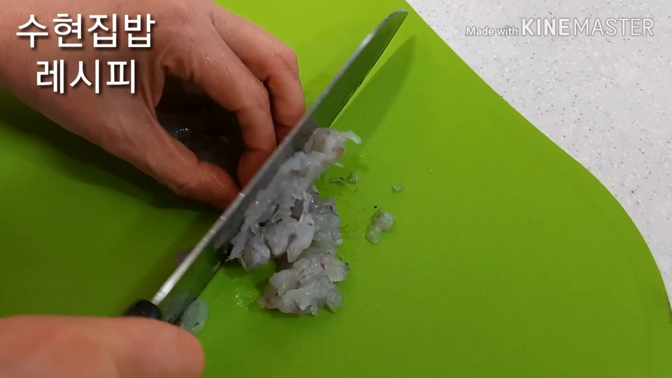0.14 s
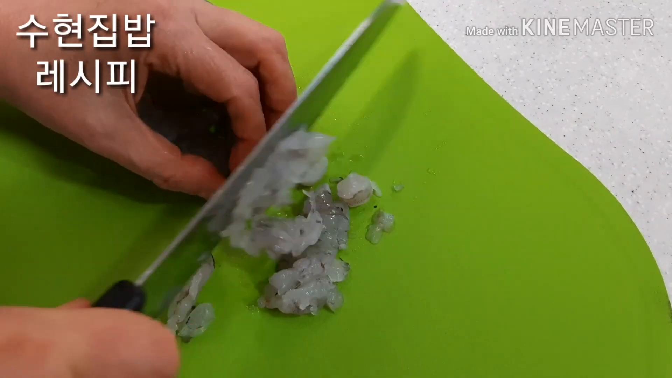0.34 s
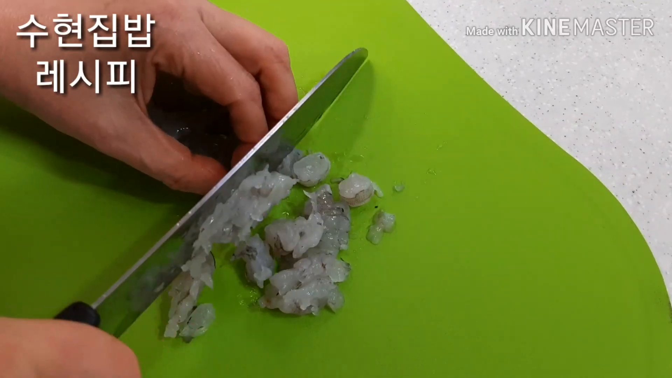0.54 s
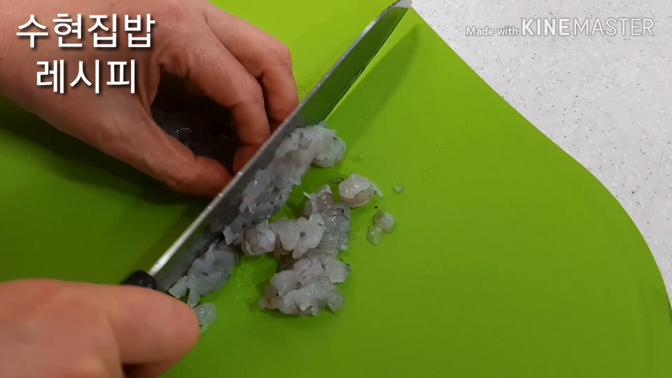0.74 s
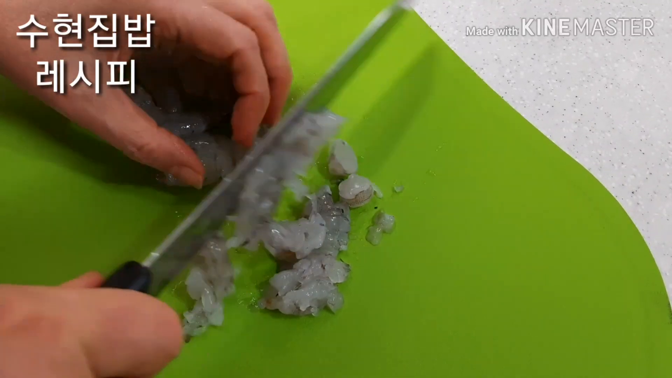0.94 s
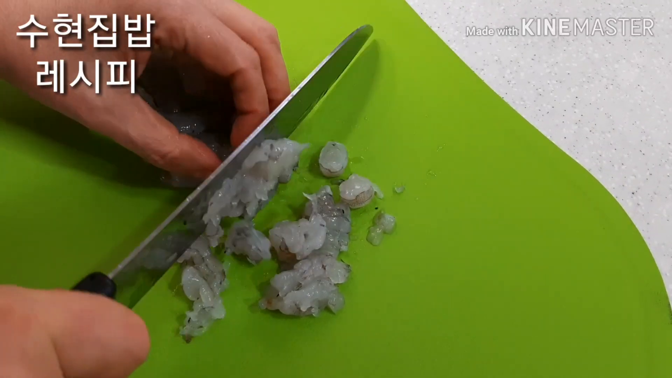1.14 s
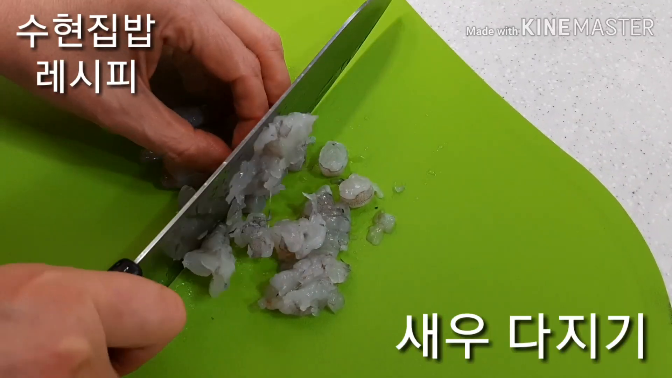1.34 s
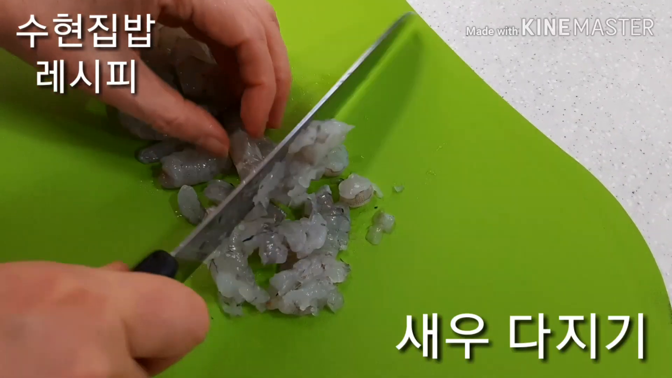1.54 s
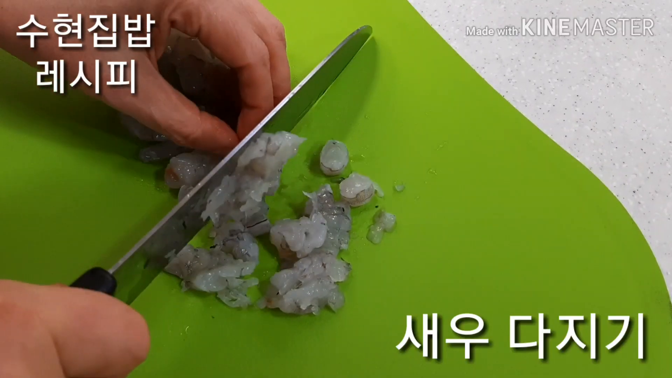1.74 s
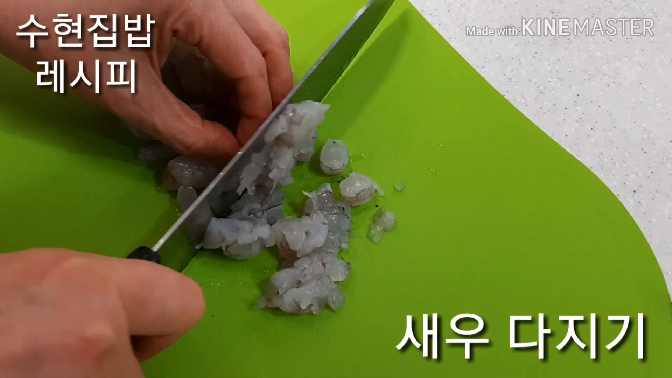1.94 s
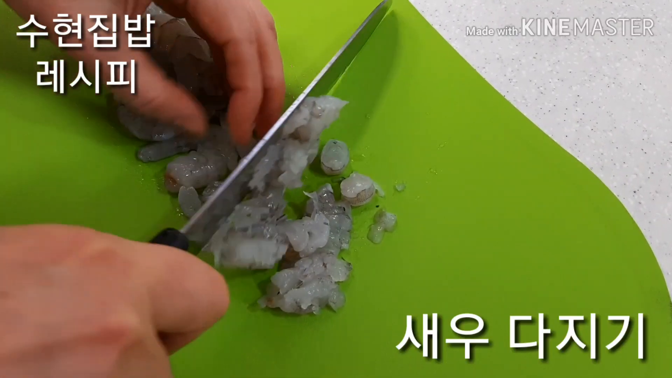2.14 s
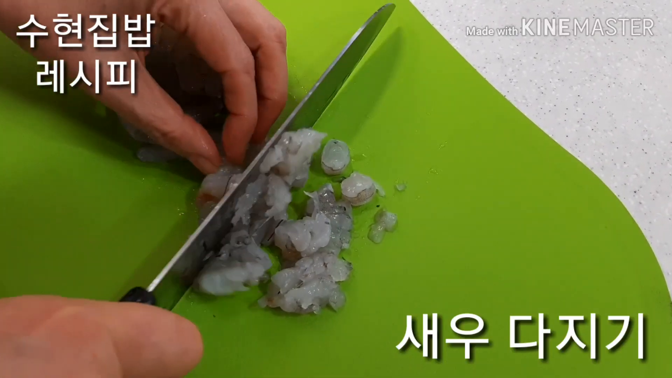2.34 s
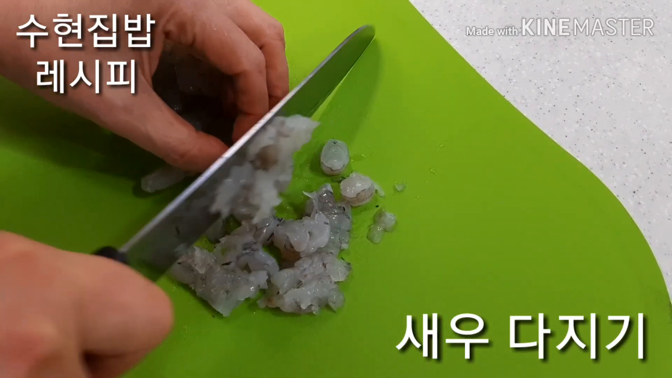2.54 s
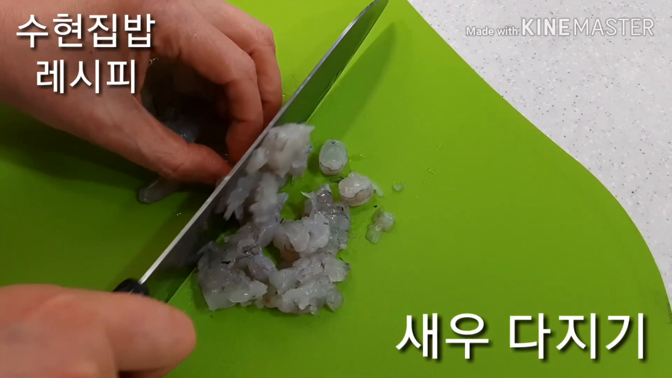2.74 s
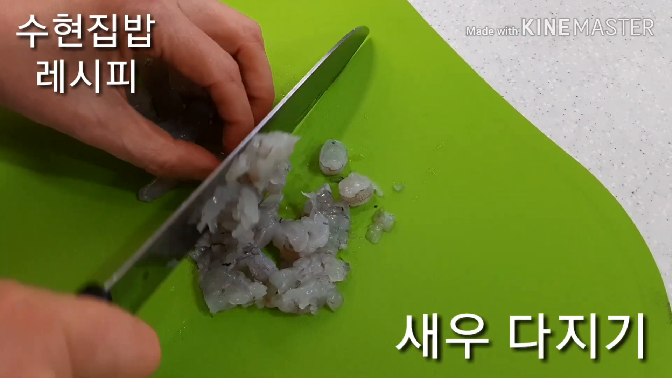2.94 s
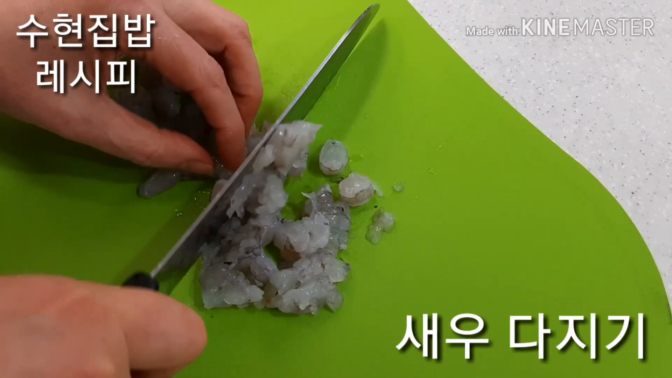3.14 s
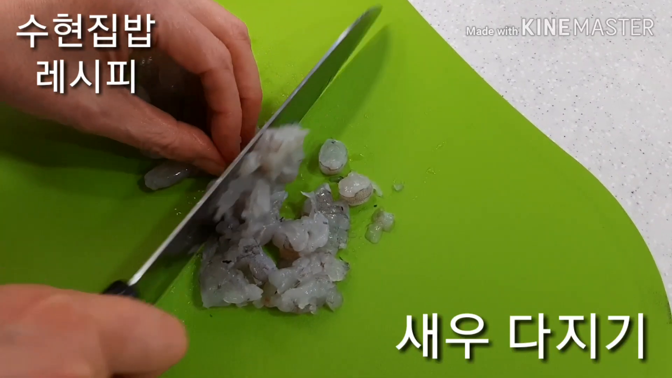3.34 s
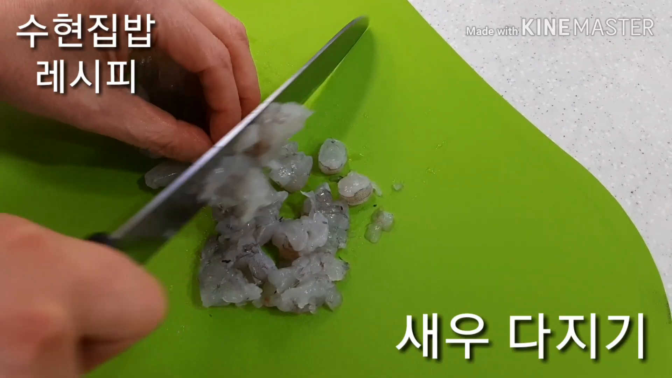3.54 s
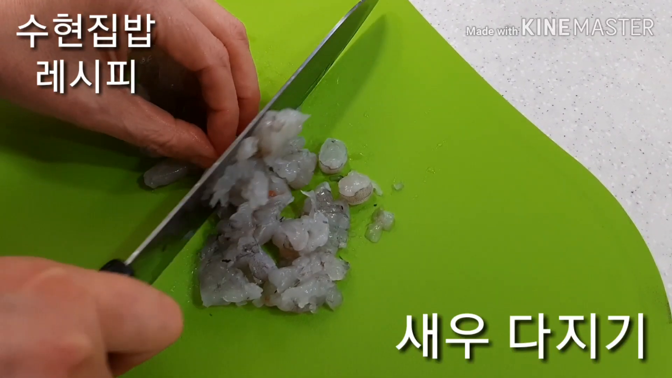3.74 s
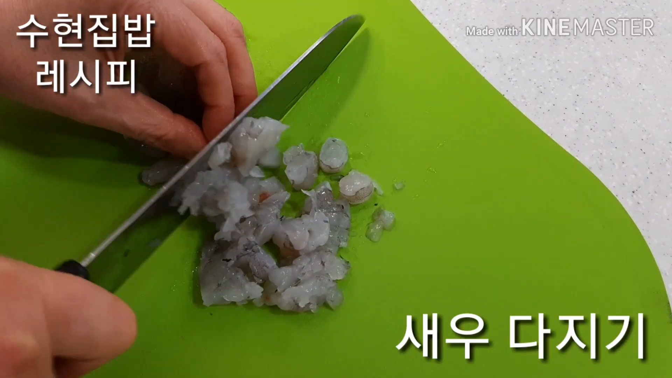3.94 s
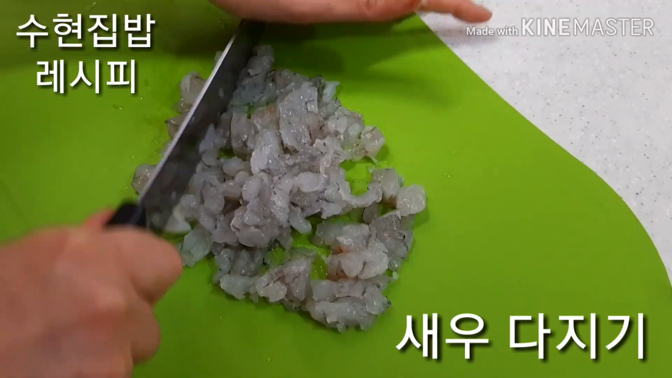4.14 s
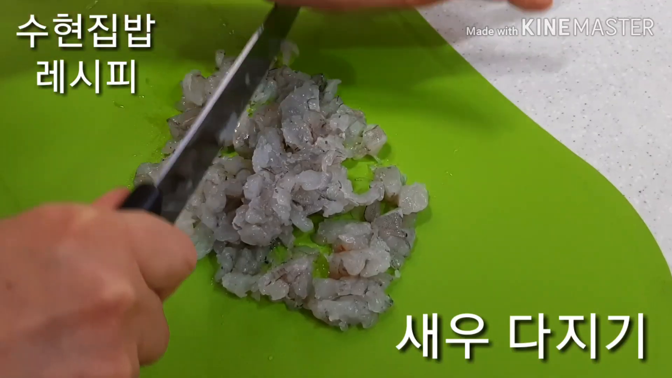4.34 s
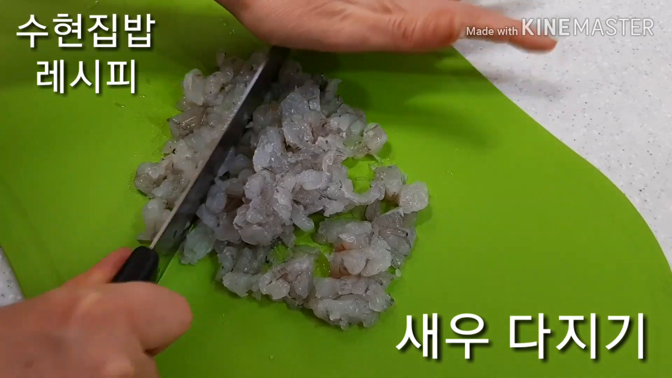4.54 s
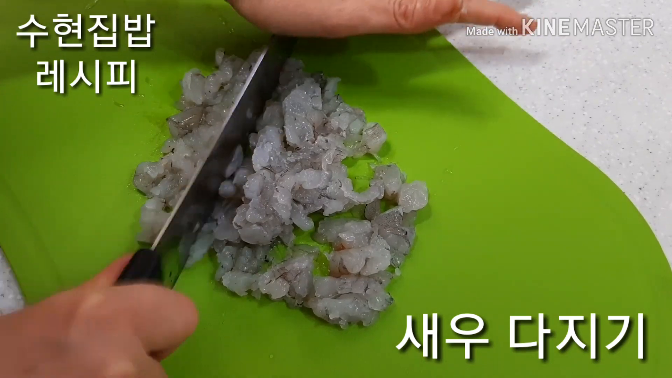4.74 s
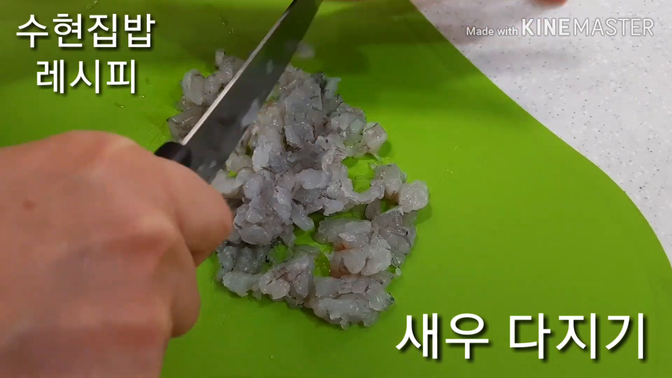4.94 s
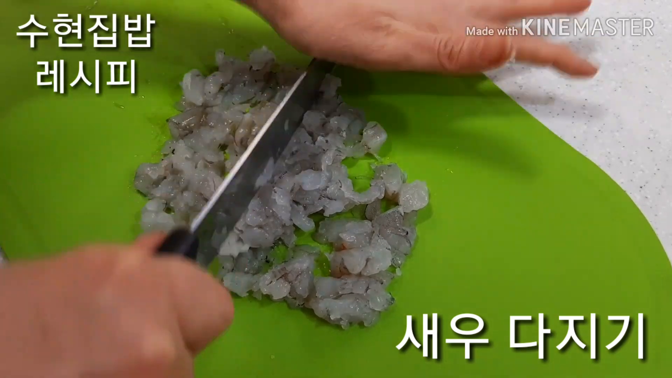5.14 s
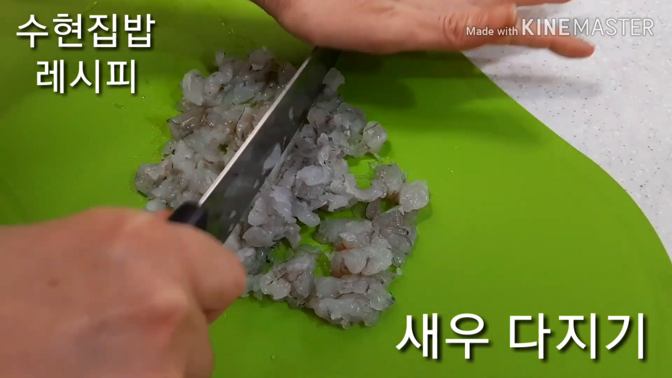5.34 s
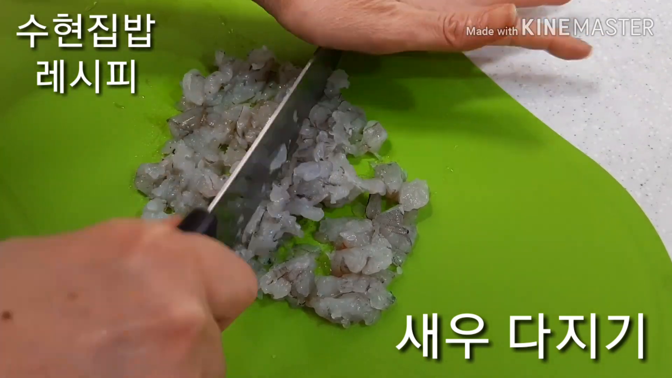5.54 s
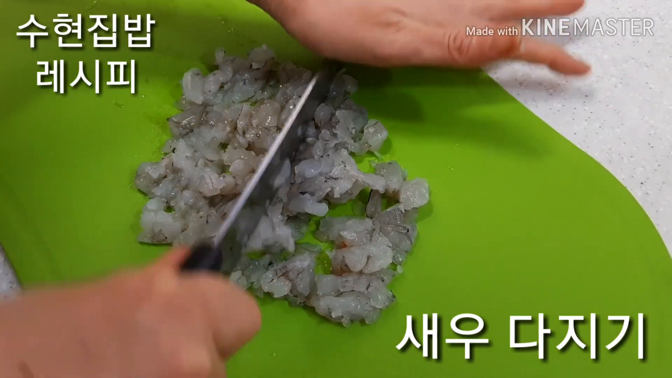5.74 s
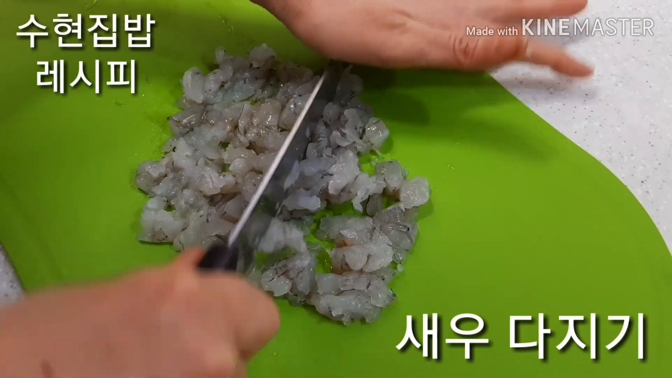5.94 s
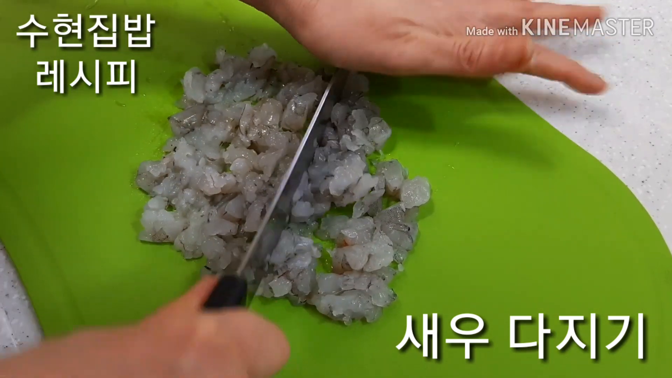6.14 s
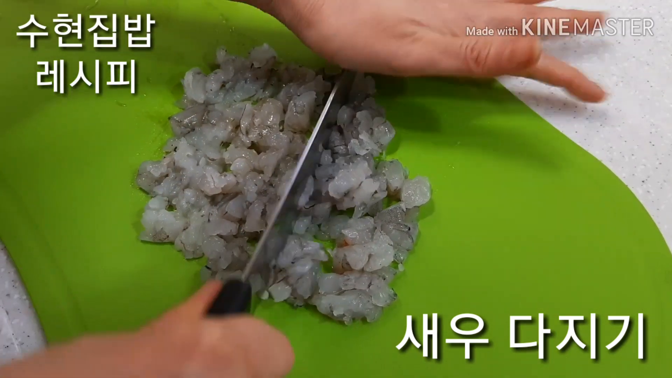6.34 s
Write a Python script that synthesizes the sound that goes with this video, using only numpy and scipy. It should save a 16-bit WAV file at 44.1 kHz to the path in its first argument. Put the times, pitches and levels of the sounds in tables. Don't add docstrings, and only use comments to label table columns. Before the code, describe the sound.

A kitchen knife slices wet shrimp on a thin plastic mat, slow soft crunches and knocks, then quicker, louder mincing chops with counter thuds.

```python
import sys
import numpy as np
from scipy import signal
from scipy.fft import rfft, irfft
from scipy.io import wavfile
from scipy.ndimage import uniform_filter1d

SR = 44100
rng = np.random.default_rng(int(sys.argv[2]) if len(sys.argv) > 2 else 0)


def pcm_store(signal):
    levels = np.round(np.clip(np.atleast_2d(signal), -1, 1) * 32767)
    wavfile.write(sys.argv[1], SR, levels.astype(np.int16).T)


def to_linear_factor(level_db):
    exponent = np.asarray(level_db, float) / 20
    return 10 ** exponent


N = 281358
PORT_LAG = 14


def unit(x):
    return x / np.sqrt(np.mean(x ** 2))


def on_log(hz, table):
    f, v = np.transpose(table)
    return np.interp(np.log(np.maximum(hz, 1)), np.log(f), v)


def colour(x, table):
    hz = np.fft.rfftfreq(x.shape[-1], 1 / SR)
    return unit(irfft(rfft(x) * to_linear_factor(on_log(hz, table)), x.shape[-1]))


def drift(shape, samples):
    return unit(uniform_filter1d(rng.standard_normal(shape), size=samples))


def decay(t_s, t60_s):
    return np.exp(-np.log(1000) * t_s / t60_s)


def high_pass(x, hz):
    return signal.sosfilt(signal.butter(2, hz, "high", fs=SR, output="sos"), x)


def add(track, sound, s):
    i = min(int(s * SR), N)
    track[..., i:i + sound.shape[-1]] += sound[..., :N - i]


def ports(x, lag, pan_db=0):
    left = np.pad(x, (max(lag, 0), 0))[:len(x)]
    right = np.pad(x, (max(-lag, 0), 0))[:len(x)]
    return np.array([left * to_linear_factor(pan_db / 2), right * to_linear_factor(-pan_db / 2)])


def alike(mid, side, hz, corner_hz):
    share = np.clip(hz / corner_hz, 0, 1)
    return np.array([mid + share * side, mid - share * side]) / np.sqrt(1 + share ** 2)


def ring(modes, gain_db, detune=np.ones(1), stretch=1):
    hz, db, t60 = np.transpose(modes)[:, :, None]
    t = np.arange(int(SR * min(t60.max() * stretch, 1 / 3))) / SR
    tones = np.sin(2 * np.pi * hz * detune[:, None] * t)
    h = (to_linear_factor(db + gain_db[:, None]) * decay(t, t60 * stretch) * tones).sum(0)
    return h / np.abs(h).max()


# frequency in Hz, density in dB per Hz.
HUM_SPECTRUM = [(15, -56), (25, -1), (190, -2), (320, -4.5), (581, -21), (980, -20), (1900, -29.5),
                (15500, -34)]


def kitchen():
    mid, side = (rfft(colour(rng.standard_normal(N), HUM_SPECTRUM)) for _ in range(2))
    hum = irfft(alike(mid, side, np.fft.rfftfreq(N, 1 / SR), 920), N)
    level_db, swell_db = -66.5, 1.07
    return to_linear_factor(level_db) * hum * to_linear_factor([[0], [0.5]]) * to_linear_factor(swell_db * drift(N, 5000))


def slips(per_s, spread_db, smooth):
    size = to_linear_factor(spread_db * np.minimum(rng.exponential(size=N), 4))
    clicks = (rng.random(N) < per_s / SR) * size * rng.standard_normal(N)
    return unit(unit(clicks) + smooth * rng.standard_normal(N))


def patchy(x, db, cells_hz, cells_ms):
    f, t, z = signal.stft(x, SR, nperseg=256)
    field = rng.standard_normal(z.shape)
    field = uniform_filter1d(field, size=max(int(cells_hz / f[1]), 1), axis=-2)
    field = unit(uniform_filter1d(field, size=max(int(cells_ms / 1000 / t[1]), 1), axis=-1))
    return unit(signal.istft(z * to_linear_factor(db * field), SR, nperseg=256)[1][..., :N])


def pressure(rows, shape, attack_s):
    rise_db, let_go_s, tail_s = 25, 0.018, 0.26
    gain = np.zeros((3, N))
    for s, length_s, first_db, last_db, *rumble_db in rows:
        times = np.cumsum([s - attack_s, attack_s, max(length_s, 0.001), let_go_s, tail_s])
        i = np.arange(max(int(times[0] * SR), 0), min(int(times[-1] * SR), N))
        for k, (early_db, late_db, drop_db, fall_db_s) in enumerate(shape):
            start, end = first_db + early_db, last_db + late_db
            released = end - drop_db
            db = np.array([start - rise_db, start, end, released, released - fall_db_s * tail_s])
            if k == 1:
                db = db + sum(rumble_db)
            gain[k, i] = np.maximum(gain[k, i], to_linear_factor(np.interp(i / SR, times, db)))
    return gain


# frequency in Hz, level in dB, t60 in seconds.
SLAB_MODES = [(52.4, -4, 0.081), (80.5, -30, 0.031), (118, -9.5, 0.028), (134, 6, 0.085), (148.7, -6, 0.45),
              (198.3, 3, 0.19), (211.8, 0, 0.25), (224.5, -1, 0.13)]
# frequency in Hz, level in dB, t60 in seconds.
COUNTER_MODES = [(240, -29, 0.15), (290, -24, 0.2), (342, -5, 0.31), (369.3, 7.5, 0.18), (389, -4, 0.13),
                 (435, 7.5, 0.096), (507.6, -2.5, 0.17), (560.5, 5.5, 0.1), (644, 6.5, 0.07),
                 (693.3, 0, 0.082), (748.7, -4.5, 0.17), (796, -17.5, 0.19), (873, -8, 0.084),
                 (969, -13.5, 0.11)]


def rumble(gain):
    out, modes = 0, SLAB_MODES[-4:] + COUNTER_MODES
    tilt_db = np.linspace(-2.5, 3, len(modes))
    for lag in (-4, 4, PORT_LAG):
        spot, *port = rng.standard_normal((3, len(modes)))
        shake = np.array([ring(modes, tilt_db + 5.3 * p, 1 + 0.017 * spot, stretch=0.61) for p in port])
        judder = slips(400, 1.2, 0.2)
        scale = np.std(signal.fftconvolve(judder, shake[0]))
        out = out + signal.fftconvolve(ports(judder * gain, lag), shake, axes=1)[:, :N] / scale
    return high_pass(out, 120) * to_linear_factor(-11)


# start in seconds, length in seconds, hiss in dB at the bite,
# hiss in dB at the end, rumble re hiss in dB.
SLICES = [(0.042, 0.025, -55.5, -56, 8.5), (0.07, 0.024, -52.5, -48.5, 11), (0.105, 0.035, -50, -50, 11.5),
          (0.658, 0.097, -65, -45.5, 9.5), (1.316, 0.081, -55, -52.5, 10), (1.915, 0.072, -56, -52, 11),
          (2.36, 0.028, -63.5, -63, 14), (2.7, 0.089, -55, -53.5, 9.5), (3.036, 0.07, -68, -61, 12.5),
          (3.374, 0.045, -52, -46.5, 9.5), (3.69, 0.078, -51.5, -56.5, 10.5), (4.036, 0.068, -53, -56, 10)]
# start in seconds, length in seconds, hiss in dB at first,
# hiss in dB at last, rumble re hiss in dB.
TIP_PLANTS = [
    (1.777, 0.031, -68.5, -71, 29),
    (4.46, 0.058, -61, -69, 36),
    (5.192, 0.016, -57, -66, 36),
]
# start in seconds, length in seconds, hiss in dB at first,
# hiss in dB at last, rumble re hiss in dB.
MINCE_CHOPS = [
    (4.549, 0.019, -56.5, -41.5, 9),
    (4.798, 0.017, -63, -37, 1.5),
    (5.24, 0.039, -46.5, -43, 8.5),
    (5.471, 0.023, -59, -41, 9.5),
    (5.69, 0.022, -53, -38, 2.5),
    (5.88, 0.045, -73.5, -38.5, 11.5),
    (6.118, 0.016, -43.5, -38, 7.5),
    (6.322, 0.022, -52.5, -45, 13),
    (6.364, 0.0052, -41, -43, -6),
]
# start in seconds, length in seconds, hiss in dB at first,
# hiss in dB at last.
PEELS = [(0.232, 0.015, -58, -55.5), (0.287, 0.016, -61, -61), (0.842, 0.038, -65, -58.5),
         (0.91, 0.0072, -53.5, -64.5), (1.29, 0.014, -73, -78), (1.498, 0.022, -61.5, -63),
         (1.548, 0.019, -55.5, -55.5), (2.075, 0.028, -66, -62), (2.19, 0.039, -79, -77),
         (2.445, 0.027, -73, -58.5), (2.8, 0.061, -65, -66), (3.165, 0.084, -70, -82),
         (3.46, 0.1, -65, -73), (3.535, 0.16, -79.5, -76), (3.79, 0.048, -70, -64.5),
         (4.015, 0.025, -66, -53), (4.13, 0.069, -70, -69.5), (4.245, 0.13, -67.5, -94),
         (5.32, 0.059, -57, -62), (5.53, 0.026, -68, -54), (5.755, 0.06, -54, -65),
         (5.95, 0.034, -46.5, -58), (6.04, .06, -75, -68), (6.155, 0.053, -58, -59),
         (6.235, 0.065, -78, -77)]
# offset in dB at first, offset in dB at last,
# quick drop in dB on letting go, then fall in dB per second.
SLICE_SHAPE = [(1, -1, 18, 166), (0.5, 0, 14.5, 106), (-8, -2, 16.5, 244)]
TIP_PLANT_SHAPE = [(2, -9, 1.9, 58), (2, -3.5, 6.2, 510), (13, 5, 2.6, 130)]
MINCE_CHOP_SHAPE = [(-0.5, -2, 25, 90), (-10.5, -1, 18.7, 144), (-7, -5, 14.4, 170)]
PEEL_SHAPE = [(-1, 0, 18, 150), (-5, -3, 4.4, 100), (-5.5, -8, 24, 190)]
# frequency in Hz, density in dB per Hz.
HISS_SPECTRUM = [(2060, -60), (3500, -11.5), (5460, -2), (8670, 4), (9800, -1), (13400, 2.5), (15300, -4),
                 (16300, -4)]
# frequency in Hz, density in dB per Hz.
BODY_SPECTRUM = [(530, -1.5), (960, -5), (1300, -6.5), (1880, -8), (2270, -7.5), (5500, -5.5), (7150, -65),
                 (12100, -120)]


def slicing():
    moves = [(SLICES, SLICE_SHAPE, 0.011), (TIP_PLANTS, TIP_PLANT_SHAPE, 0.0024),
             (MINCE_CHOPS, MINCE_CHOP_SHAPE, 0.011), (PEELS, PEEL_SHAPE, 0.021)]
    gain = uniform_filter1d(np.max([pressure(*move) for move in moves], axis=0), size=90)
    drag = 0
    for lag, db in [(-4, -2), (4, -4), (PORT_LAG, -1.5)]:
        drag = drag + to_linear_factor(db) * ports(slips(5000, 2.0, 0.45), lag)
    drag = drag * to_linear_factor(1.8 * drift(N, 160))
    hiss = gain[0] * patchy(colour(drag, HISS_SPECTRUM), 2.6, 1500, 8) * to_linear_factor([[-0.5], [2.5]])
    body = gain[2] * patchy(colour(drag, BODY_SPECTRUM), 4.2, 500, 15)
    return hiss + body + rumble(gain[1])


def crowd(modes, spread, count):
    hz, db, t60 = np.repeat(np.transpose(modes), count, axis=1)
    return np.transpose([hz * (1 + spread * rng.uniform(-1.16, 1, len(hz))), db, t60])


# start in seconds, knock peak in dB, clack re knock in dB.
BLOWS = [(0.043, -38.5, -6.5), (0.071, -53, -17), (0.085, -40.5, -24), (0.127, -50, 12),
         (0.662, -43.5, -31), (0.734, -50, -16), (1.315, -32, -12), (1.7785, -26, -48), (1.926, -50, -10),
         (2.362, -45, -33), (2.697, -47, 4.5), (2.747, -51, -0.5), (3.072, -42.5, -20), (3.376, -34.5, -8),
         (3.424, -30.5, -6.5), (3.689, -44, -16), (3.732, -37, -5), (4.043, -56, -26), (4.4582, -20, -4),
         (4.572, -50, 11), (5.1913, -24, -8.5), (5.238, -31, -19), (5.494, -42.5, 6), (5.713, -41, 6),
         (5.922, -28, -3), (5.954, -66, -13), (6.13, -27.5, -9), (6.158, -38.5, 0.5), (6.337, -35.5, 2.5),
         (6.365, -54, -2)]
BLOW_TILT_DB = [-2, 3, -1, 3, -8, -1, 2, 1.5, -7, -16, 3, 0.1, 0.1, -5, 0.5, -3, -6, 2, 5.5, -5, -5, -5, -6,
                -8, -1.5, 0.1, -0.5, 0.1, 2, 0.1]
# frequency in Hz, level in dB, t60 in seconds.
BLADE_MODES = [(1120, 11.5, 0.038), (1222, 4, 0.1), (1384, 11.5, 0.066), (1490, 12.5, 0.064),
               (1649, 15, 0.03), (1814, -4, 0.22), (2050, 9.5, 0.097), (2250, 14, 0.074), (2547, 7, 0.075),
               (3100, 12, 0.062), (4100, -7, 0.018), (4800, -2, 0.018), (8450, 7, 0.013)]


def knocks():
    out = np.zeros((2, N))
    push = np.hanning(int(0.0005 * SR))
    push = push / push.sum()
    first_push = 0.88 * np.hanning(int(0.0016 * SR))
    for (s, db, clack_db), tilt_db in zip(BLOWS, BLOW_TILT_DB):
        for k in range(2):
            wood, steel = crowd(COUNTER_MODES, 0.013, count=2), crowd(BLADE_MODES, 0.03, count=3)
            wood_db = 2.5 * rng.standard_normal(len(wood)) + tilt_db * np.log2(wood[:, 0] / 500)
            steel_db = 2.5 * rng.standard_normal(len(steel))
            at = s - k * 10 / SR
            add(out[k], to_linear_factor(db) * np.convolve(ring(wood, wood_db), push), at + 0.00061)
            add(out[k], to_linear_factor(db) * first_push, at + 0.0012)
            add(out[k], to_linear_factor(db + clack_db + 2.5) * ring(steel, steel_db), at + 0.00107)
    return high_pass(out, 170)


# start in seconds, peak in dB, centre in
# Hz, left minus right in dB.
FLESH_TICKS = [(0.043, -37, 8600, 0), (0.072, -30, 9300, 1), (0.131, -28, 11000, 8), (0.236, -57, 12100, 7),
               (0.2966, -36.5, 6400, -4), (0.4213, -67, 8700, -9), (0.7165, -36, 13200, 11),
               (0.736, -38, 8300, -5), (0.843, -49.5, 5800, 19), (0.8794, -54, 8740, 2),
               (0.916, -34, 13900, -3), (0.965, -44, 8800, -6), (1.313, -32, 8500, -7),
               (1.4963, -45, 6540, -4), (1.554, -36, 7500, 0), (1.912, -49, 10600, -9),
               (2.0897, -35, 11600, -7), (2.198, -56, 9100, -2.5), (2.4414, -53, 10500, -2),
               (2.4974, -42, 13500, -2), (2.7001, -28, 8160, -7), (2.833, -36, 14500, 1),
               (3.0356, -35.5, 8400, 2), (3.3745, -29, 8600, -1), (3.49, -38, 4850, 0),
               (3.691, -41, 8800, -4), (3.8, -51, 9700, 9), (4.017, -44, 8850, -1),
               (4.2444, -72, 12500, -5),
               (4.5503, -40, 8750, -9), (4.8028, -36.5, 12340, -26), (4.9553, -47.5, 8560, -8),
              (5.239, -27, 13200, -3), (5.3288, -35, 10700, -5), (5.362, -39.5, 8600, -4.0),
              (5.4743, -39, 12000, -3.0), (5.5463, -32.5, 13400, -6.0), (5.676, -46, 13200, -1.5),
              (5.6855, -39, 12900, -4.0), (5.7, -25, 13400, -2.5), (5.761, -43, 9050, -7),
              (5.7713, -28, 13800, -3.5), (5.877, -46, 12000, -5), (5.901, -27.5, 13230, -3.5),
              (5.9444, -37, 12600, -8), (5.9557, -30.5, 11800, -10), (5.9827, -29.5, 11000, -6.5),
              (6.1185, -35, 10180, -2.0), (6.1559, -40, 8680, -20), (6.1854, -31, 12100, -1.5),
              (6.318, -48, 12100, -9), (6.3645, -31, 11770, -5)]


def ticks():
    out, t = np.zeros((2, N)), np.arange(500) / SR
    for s, db, hz, pan_db in FLESH_TICKS:
        click = np.exp(-np.abs(t - 0.0005) / 0.0002) * np.sin(2 * np.pi * hz * t)
        sizzle = 0.21 * np.exp(-t / 0.0018) * np.diff(rng.standard_normal(len(t) + 2), 2)
        add(out, to_linear_factor(db - 0.5) * ports(click + sizzle, rng.integers(0, PORT_LAG + 1), pan_db), s)
    return out


# start in seconds, peak in dB, centre in Hz.
FIBRE_CRACKS = [(0.0433, -43, 8390), (0.0707, -39, 10300), (0.076, -36, 9490), (0.085, -39, 9320),
                (0.128, -29.5, 14000), (0.1382, -36, 3480), (0.6734, -43, 8730), (0.7003, -35, 12400),
                (0.736, -38, 8440), (0.9146, -37, 4350), (1.3713, -49, 8240), (1.933, -36, 9390),
                (2.37, -48, 12600), (2.4558, -49.5, 8300), (2.753, -40, 8450), (3.383, -37, 8450),
                (3.422, -34, 3400), (3.698, -37, 10900), (4.0341, -33.5, 8400), (4.5335, -42, 12300),
                (4.548, -38.5, 9900), (4.571, -28.5, 2960), (4.6603, -48, 12300), (4.7945, -42, 12800),
                (4.81, -45, 12500), (4.8147, -27, 12300), (5.206, -37.5, 3070), (5.2285, -36, 14300),
                (5.239, -28, 12400), (5.259, -31, 6150), (5.2702, -32.5, 3350), (5.48, -28.5, 13300),
                (5.5318, -40, 11700), (5.691, -31, 12300), (5.7108, -21.5, 12000), (5.9048, -41, 11700),
                (5.9207, -29, 11600), (6.115, -33, 9710), (6.329, -32, 9380), (6.333, -33, 3030)]


def cracks():
    out, t = np.zeros((2, N)), np.arange(600) / SR
    decay_s, wide_db = 0.0046, -6
    for s, db, hz in FIBRE_CRACKS:
        wide = np.diff(rng.standard_normal(len(t) + 1))
        tuned = colour(wide, [(hz / 2, -22), (hz, 0), (hz * 2, -22)])
        burst = np.exp(-t / decay_s) * (tuned + to_linear_factor(wide_db) * unit(wide))
        burst = burst / np.abs(burst).max()
        add(out, to_linear_factor(db - 3) * ports(burst, rng.integers(0, PORT_LAG + 1), -7), s)
    return out


# start in seconds, peak in dB, modes below 170 Hz re rest in dB.
FLAT_LANDINGS = [(0.075, -34, 1), (0.769, -49, -15), (1.234, -40, 18), (1.315, -49.5, -12),
                 (1.421, -48, 11), (1.778, -38, 5), (2.36, -42.5, 10), (2.702, -43.5, 5), (3.069, -50, -14),
                 (3.379, -34.5, -5), (4.041, -56, -18), (4.459, -35, 16), (4.572, -27.5, 4),
                 (4.816, -28.5, 14.5), (5.191, -47, -8), (5.275, -37.5, 4.5), (5.494, -23, 8.5),
                 (5.713, -29, 12), (5.923, -20, 8), (6.131, -21.5, 5.5), (6.343, -21.5, 12)]


def thuds():
    out, press = np.zeros(N), np.hanning(int(0.0025 * SR))
    press = press / press.sum()
    deep = np.array(SLAB_MODES)[:, 0] < 170
    for s, db, low_db in FLAT_LANDINGS:
        spot_db, tune = rng.standard_normal((2, len(SLAB_MODES)))
        slab = ring(SLAB_MODES, spot_db + low_db * deep, 1 + 0.015 * tune)
        slab = to_linear_factor(db + 1) * np.convolve(slab, press)
        for late_s, share in [(-0.0015, 0.99), (0.0085, 1), (0.034, 0.45), (0.092, 0.13)]:
            add(out, share * slab, s + late_s)
    return ports(out, PORT_LAG, -1)


# frequency in Hz, density in dB per Hz.
SLAP_SPECTRUM = [(300, -13), (700, 3), (1400, 2), (3000, -21), (6000, -21)]


def slaps():
    out, t = np.zeros((2, N)), np.arange(SR // 4) / SR
    over_hiss_db, t60_s = 9.5, 0.3
    for s, _, hiss_db, *_ in TIP_PLANTS:
        burst = colour(rng.standard_normal((2, len(t))), SLAP_SPECTRUM) * decay(t, t60_s)
        add(out, to_linear_factor(hiss_db + over_hiss_db) * burst, s + 0.0022)
    return out


# start in seconds, length in
# seconds, # frequency in Hz, level in dB.
STEEL_SQUEAKS = [
    (2.582, 0.085, 1505, -77),
    (3.61, 0.072, 2270, -80.5),
    (3.62, .07, 1400, -82),
    (4.232, .09, 1500, -80.5),
    (6.366, 0.019, 2030, -53),
]


def squeaks():
    out = np.zeros((2, N))
    for s, length_s, hz, db in STEEL_SQUEAKS:
        t = np.arange(int(length_s * SR)) / SR
        waver = 0.5 + drift((2, len(t)), 240)
        tone = np.sin(2 * np.pi * hz * t + np.array([[0], [1.2]]))
        add(out, to_linear_factor(db) * np.hanning(len(t)) ** 0.097 * waver * tone, s)
    return out


# frequency in Hz, t60 in seconds.
ECHO_T60 = [(100, 0.48), (400, 0.47), (1500, 0.3), (5000, 0.21), (14000, 0.26)]
# frequency in Hz, energy re direct in dB.
ECHO_DB = [(100, -19), (400, -8.5), (1500, -3.5), (5000, -5.5), (14000, -12)]


def room(dry):
    t, echo = np.arange(SR * 3 // 4) / SR, 0
    for hz in 50 * 2 ** np.arange(0, 8.6, 0.5):
        band = [hz * 2 ** -0.25, min(hz * 2 ** 0.25, 0.49 * SR)]
        sos = signal.butter(2, band, "band", fs=SR, output="sos")
        mid, side = signal.sosfilt(sos, rng.standard_normal((2, len(t))))
        onset = 1 - np.exp(-(t / 0.00014) ** 2)
        fall = decay(t, max(on_log(hz, ECHO_T60), 0.05)) * onset
        level = to_linear_factor(on_log(hz, ECHO_DB)) / np.sqrt(np.sum(fall ** 2))
        echo = echo + level * alike(mid, side, hz, 1100) * fall
    sent = dry.mean(0)[None] * 0.18 + dry * 0.92
    return signal.fftconvolve(sent, echo, axes=1)[:, :N]


def scene():
    knife = slicing() + knocks() + ticks() + cracks()
    thud = thuds()
    return kitchen() + knife + thud + room(knife + 1.08 * thud) + slaps() + squeaks()


def band_limit(x):
    return signal.sosfilt(signal.butter(12, 16530, fs=SR, output="sos"), x)


# frequency in Hz, gain in dB.
MICROPHONE_RESPONSE = [(15300, 0.5), (15700, -31), (16500, -27)]


def record(dry):
    low_cut = high_pass(dry, 95)
    response = to_linear_factor(on_log(np.fft.rfftfreq(N, 1 / SR), MICROPHONE_RESPONSE))
    return band_limit(irfft(rfft(low_cut) * response, N))


dry = scene()
out = record(dry)
pcm_store(out)
```